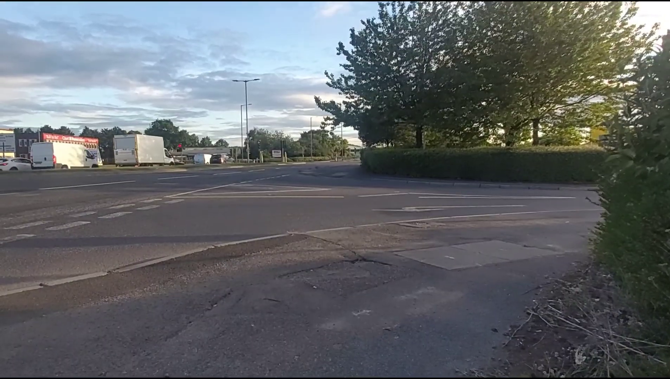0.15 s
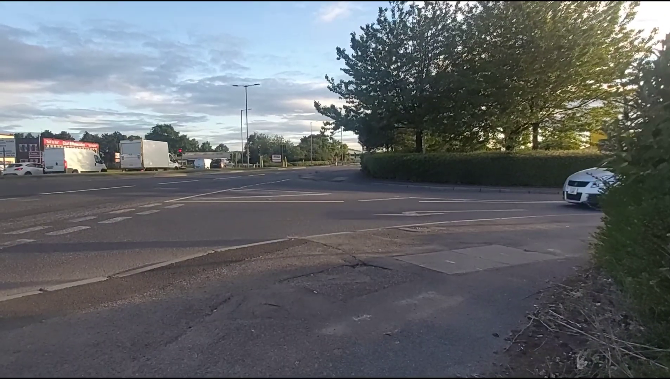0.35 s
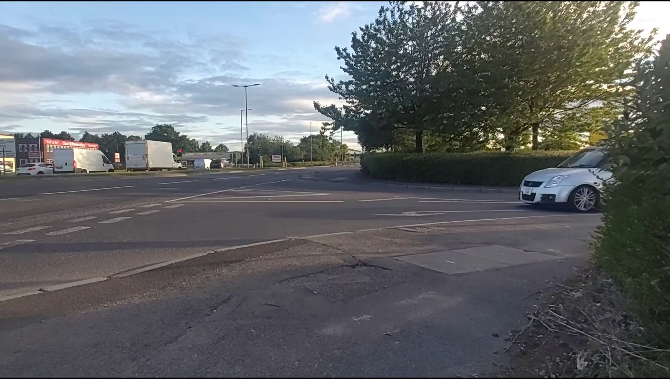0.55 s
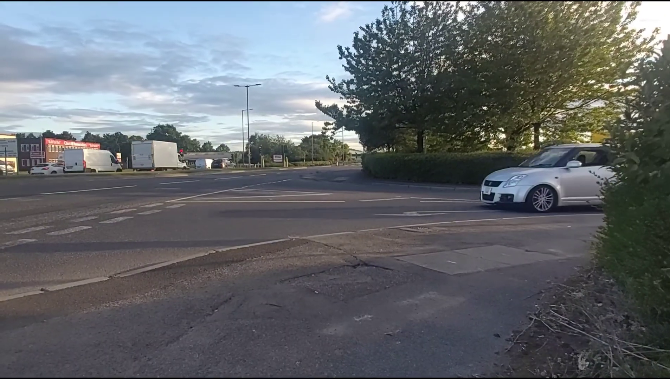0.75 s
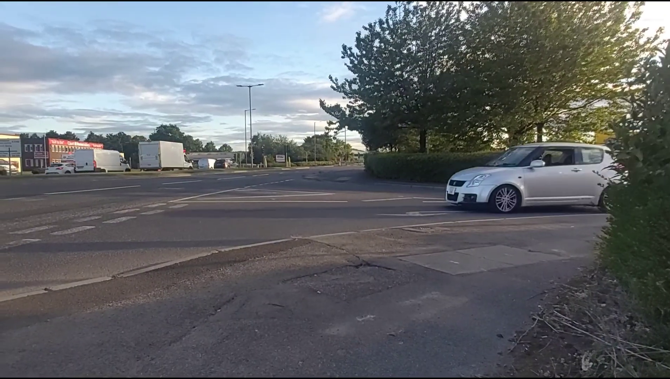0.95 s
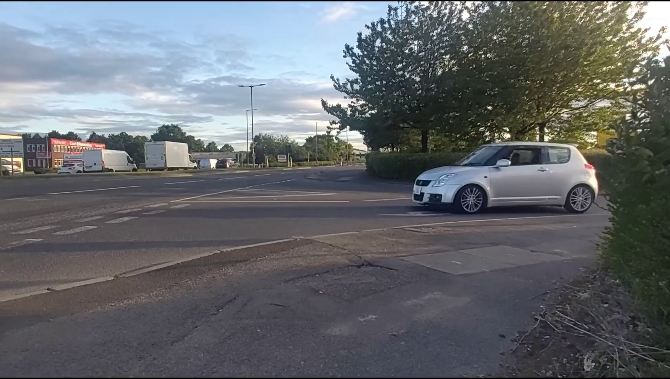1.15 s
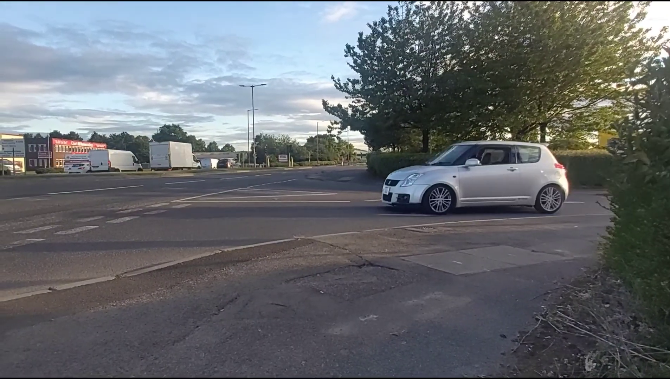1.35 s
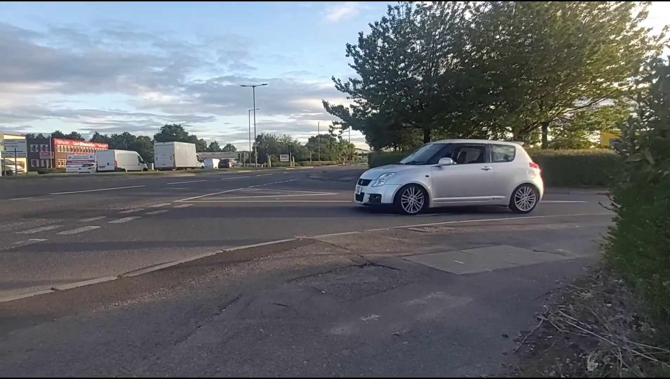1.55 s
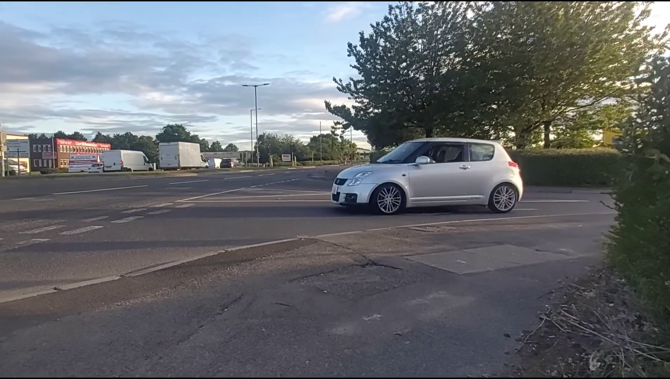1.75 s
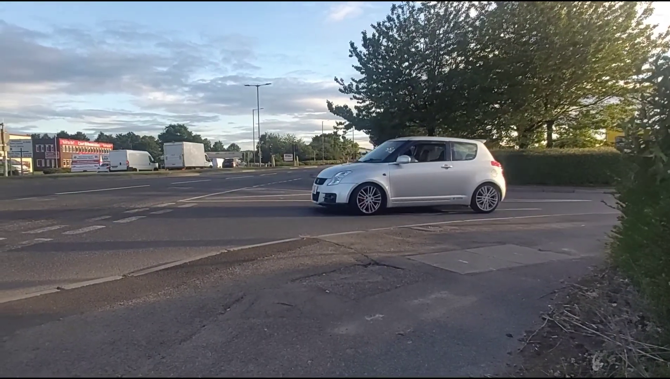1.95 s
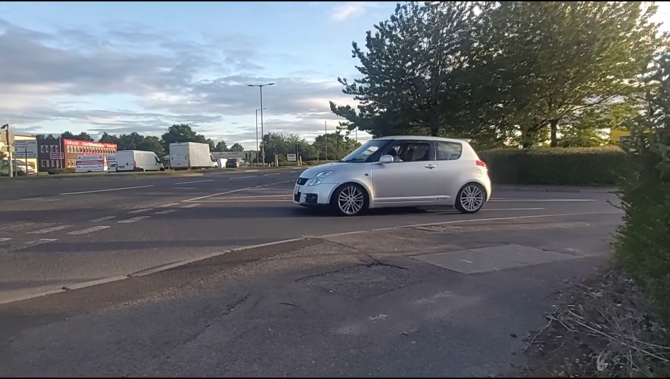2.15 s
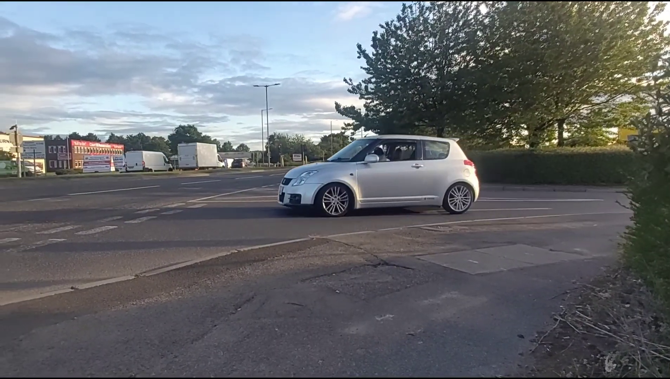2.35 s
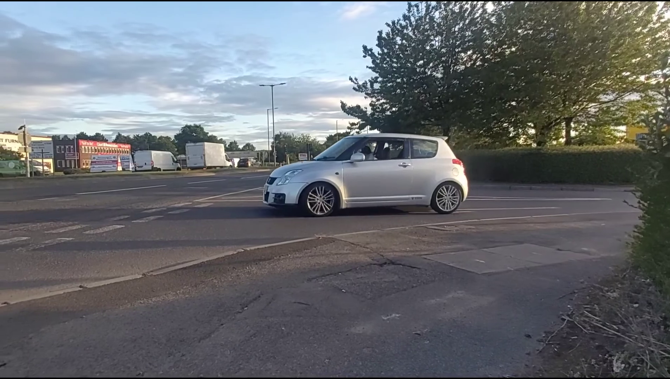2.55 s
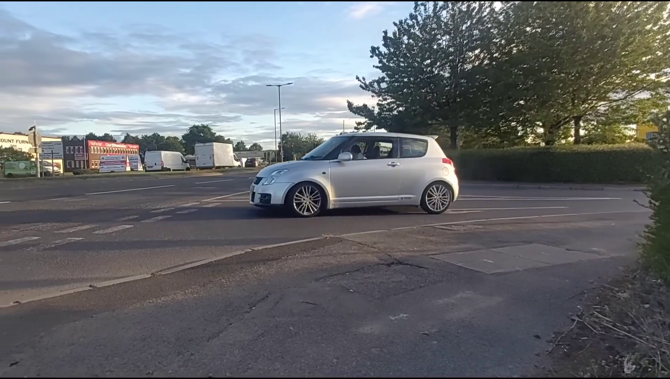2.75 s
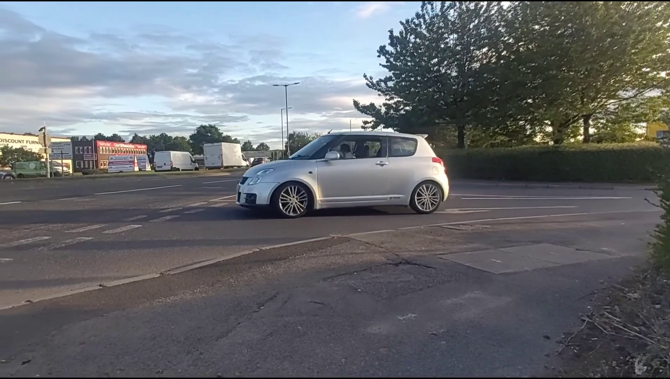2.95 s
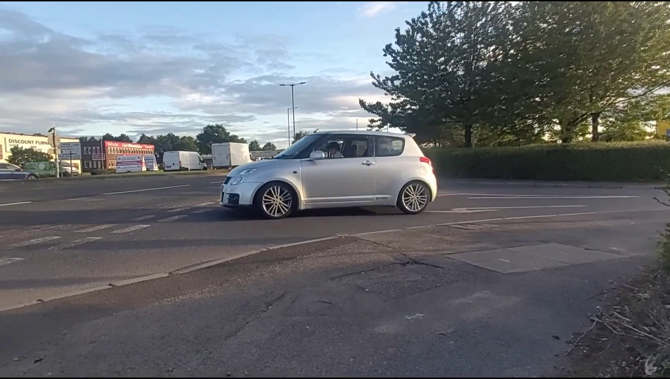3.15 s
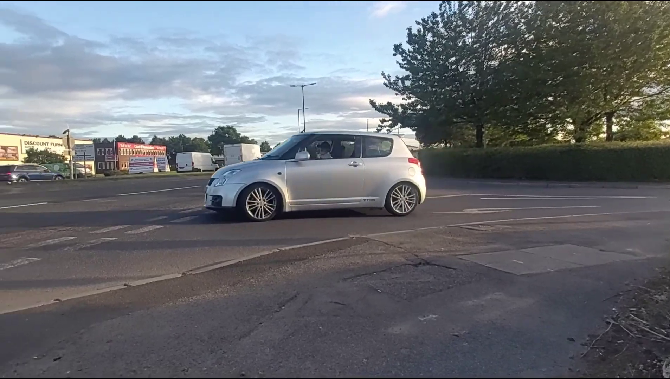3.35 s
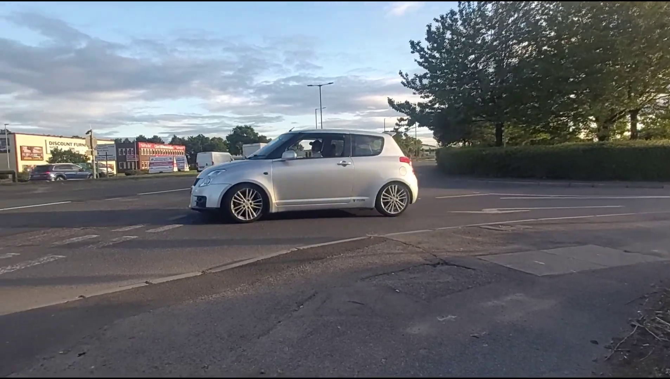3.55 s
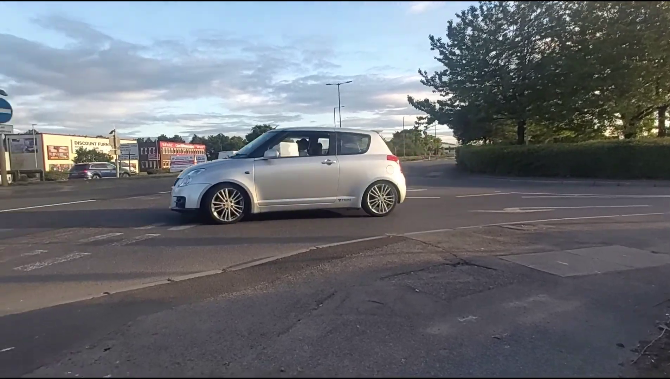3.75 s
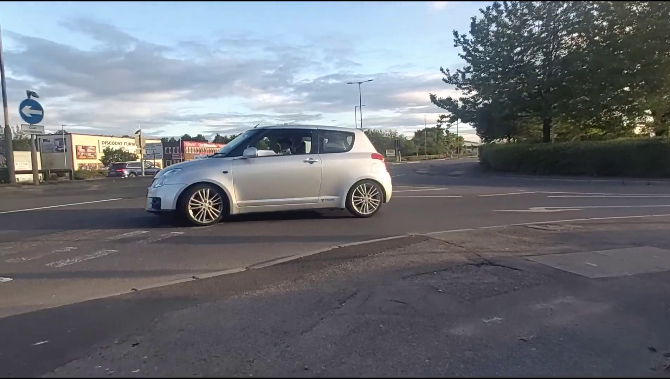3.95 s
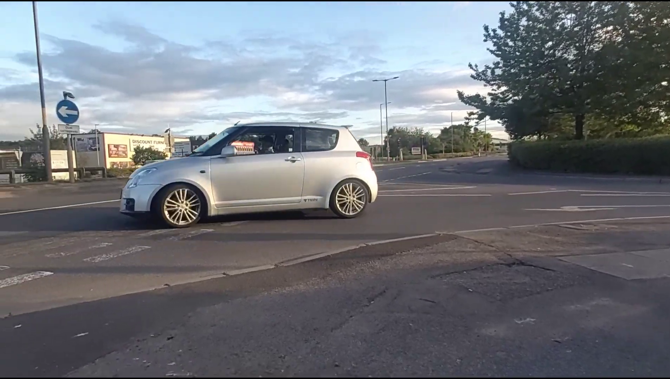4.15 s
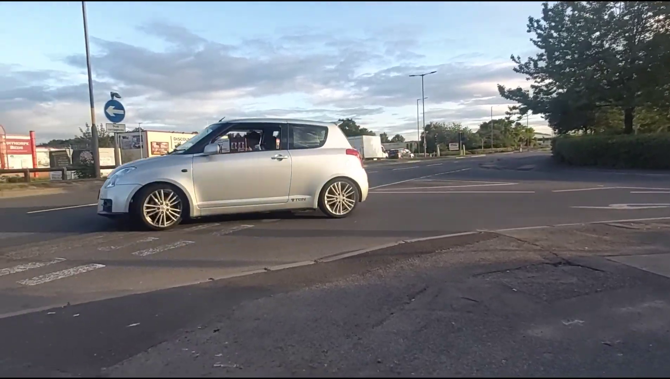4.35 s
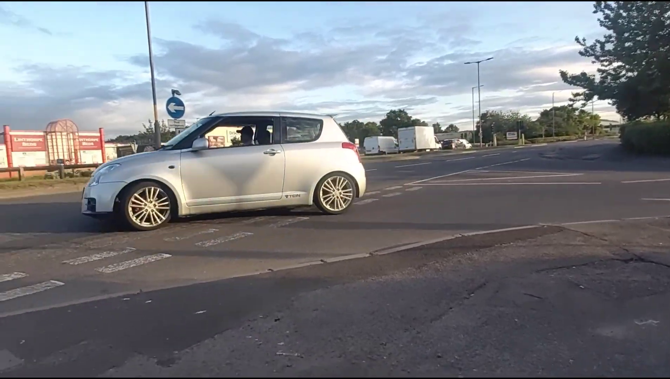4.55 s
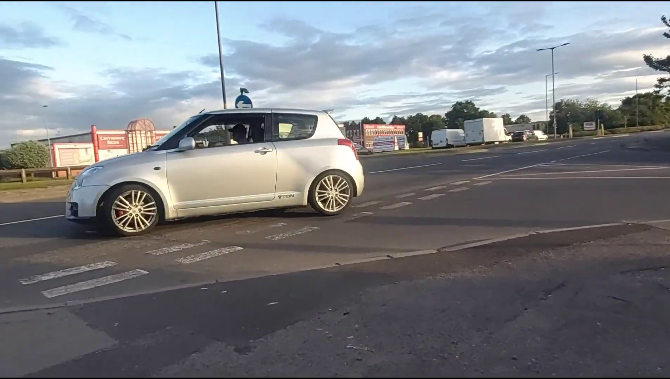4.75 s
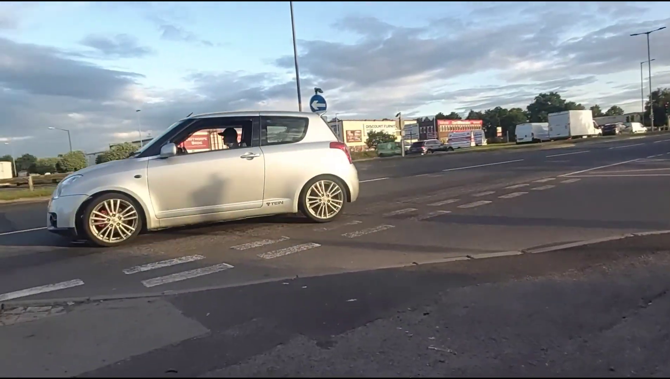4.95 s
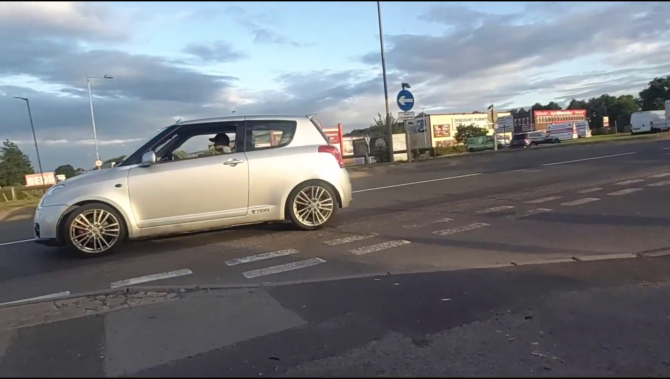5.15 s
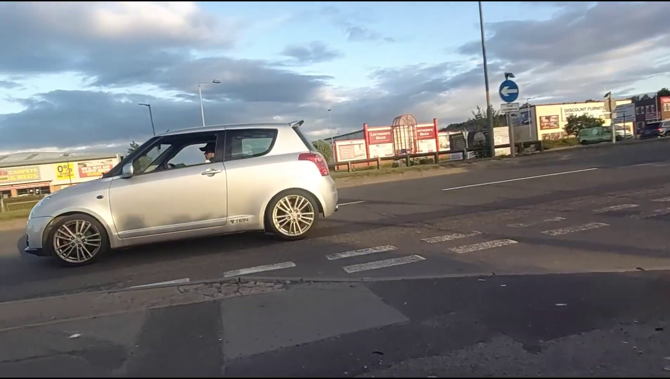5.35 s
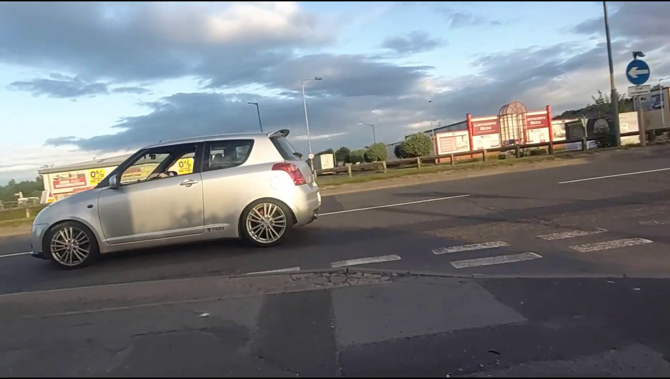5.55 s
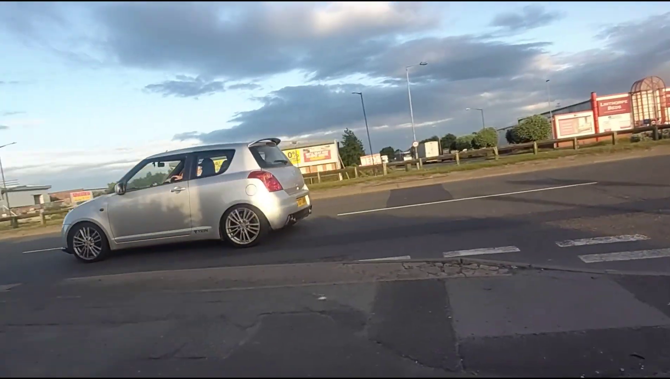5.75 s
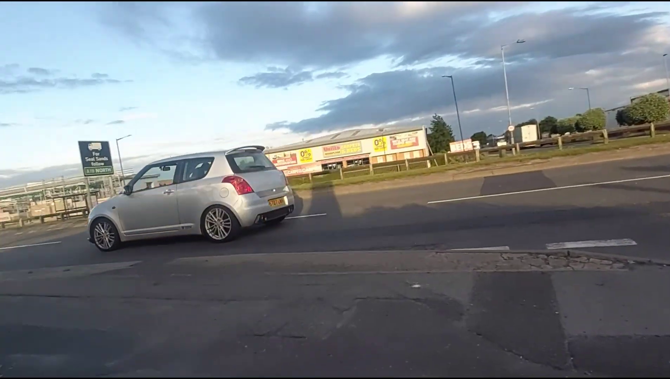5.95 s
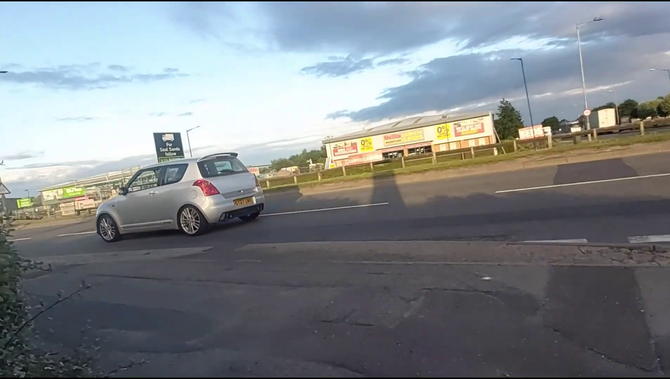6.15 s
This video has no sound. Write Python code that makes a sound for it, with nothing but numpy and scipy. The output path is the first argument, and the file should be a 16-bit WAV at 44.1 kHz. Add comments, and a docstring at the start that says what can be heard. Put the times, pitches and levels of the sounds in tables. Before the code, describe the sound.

From 0 to 0.4 s a close car under power gives a loud, ringing, throbbing roar, slightly rising in pitch, bass towards the right, then breaks off abruptly. A quiet open roadside follows: faint far traffic, low wind rumble, and dull buffets around 0.7-0.9, 1.5 and strongest at 2.1-2.25 s, with a small knocking click near 2.0 s. A small car approaches from the right, muffled behind a hedge, its tyre roll and airy whirr clearing after about 1.8 s and moving to centre. From 3 s a low engine hum and soft chug wavers at low revs while wind strengthens; a hoarse whirr rises from 3.5 s. At 4.36 s the throttle snaps open: a booming, burbling growl climbs continuously, growing louder and snarling with tyre roar. From about 5.9 s to the end at 6.2 s, bright hissing exhaust rasp joins the high revs.

```python
"""Hatchback pulling away from a junction

A car is heard close by under power and its sound breaks off at 0.4 s: firing orders in a ringing roar.
Then a small four-cylinder hatchback rolls up to a junction at low revs, with far traffic in filtered noise
and wind buffeting the microphone. It pulls away hard: its firing orders, summed as cosines, climb through
the exhaust's boom near 300 Hz, and at high revs the tailpipe rasps in puffs of hiss."""
import sys
import numpy as np
from scipy import signal
from scipy.io import wavfile
from scipy.ndimage import uniform_filter1d

SR = 44100
rng = np.random.default_rng(int(sys.argv[2]) if len(sys.argv) > 2 else 0)


def inscribe(sig):
    """Save sig as 16-bit PCM at rate SR to the path in sys.argv[1].

    A 1-D sig is mono; a 2-D sig holds one channel per row.
    Samples are clipped to [-1, 1] before scaling.
    """
    pcm = np.round(np.clip(np.atleast_2d(sig).T, -1, 1) * 32767)
    wavfile.write(sys.argv[1], SR, pcm.astype(np.int16))


N = 273861
TIME = np.arange(N) / SR
CUT_S = .399  # the first car breaks off and the junction begins


def from_db(db):
    """Decibels to gain."""
    return 10 ** (np.asarray(db) / 20)


def rms_one(x):
    """Scale to unit power."""
    return x / np.sqrt(np.mean(x ** 2) + 1e-20)


def even(x, size=4000):
    """Hold the short-term power at 1, over a window of size samples."""
    power = uniform_filter1d(np.mean(np.atleast_2d(x) ** 2, axis=0), size=size)
    return x / np.sqrt(power + 1e-12)


def in_time(rows):
    """One curve over time per column of a table, after its column of seconds."""
    s, *columns = np.transpose(rows)
    return [np.interp(TIME, s, c) for c in columns]


def at_hz(points, hz):
    """Read a spectrum on a log-frequency axis."""
    f, value = np.transpose(points)
    return np.interp(np.log(hz), np.log(f), value)


def after(start_s, fade_s):
    """A smooth switch from 0 to 1."""
    return .5 + .5 * np.tanh((TIME - start_s) / fade_s)


def hump(centre_s, half_s, order=2):
    """A rounded rise and fall of height 1; a higher order flattens its top."""
    return np.exp(-np.abs((TIME - centre_s) / half_s) ** order)


def swelling_db(rows):
    """Sum of humps in dB from rows of (centre_s, half_length_s, level_db)."""
    return sum(db * hump(s, half_s) for s, half_s, db in rows)


def drift(rate_hz):
    """Slow chance of spread 1, made at a fortieth of the sample rate by a double low-pass."""
    r = np.exp(-80 * np.pi * rate_hz / SR)
    slow = signal.lfilter([1], [1, -2 * r, r * r], rng.standard_normal(N // 40 + 2002))[2000:]
    return np.interp(np.arange(N) / 40, np.arange(len(slow)), rms_one(slow))


def band(x, low_hz, high_hz):
    """Butterworth band-pass."""
    sos = signal.butter(2, [low_hz, min(high_hz, SR / 2 - 1)], "band", fs=SR, output="sos")
    return signal.sosfilt(sos, x)


# How alike outdoor noise is at left and right: pitch_hz, likeness (1 = identical)
OUTDOOR_LIKENESS = [(60, 0.21), (700, 0.066), (1300, 0)]


def noise(colour, patchy_db, flicker_hz=14, likeness=None):
    """Third-octave bands of stereo noise, each with its own level, flicker and likeness; rms 1."""
    edges = 2 ** np.arange(np.log2(max(colour[0][0], 18)), np.log2(colour[-1][0]) + .2, 1 / 3)
    out, white = 0, rng.standard_normal((2, 2, N))
    for k, (low, high) in enumerate(zip(edges, edges[1:])):
        mid, side = band(white[k % 2], low, high)
        hz = np.sqrt(low * high)
        alike = np.clip(at_hz(likeness or OUTDOOR_LIKENESS, hz), -1, 1)
        gain = from_db(at_hz(colour, hz) + patchy_db * drift(flicker_hz))
        out = out + gain * (np.sqrt(1 + alike) * mid + np.sqrt(1 - alike) * side * [[1], [-1]])
    return rms_one(out)


def rings(modes, spread):
    """Turbulence exciting resonances (pitch_hz, width_hz, level_db); spread differs between the ears."""
    drive = rng.standard_normal(N) + spread * rng.standard_normal((2, N))
    return sum(from_db(db) * rms_one(band(drive, hz - width / 2, hz + width / 2))
               for hz, width, db in modes)


def bursts(rows, low_hz, high_hz):
    """Short band-passed puffs of noise from rows of (start_s, level_db, decay_s to fall 30 dB)."""
    envelope = sum((TIME >= s) * from_db(db - 30 * np.maximum(TIME - s, 0) / decay)
                   for s, db, decay in rows)
    grain = rng.standard_normal(N) + 0.65 * rng.standard_normal((2, N))
    puffs = envelope * rms_one(band(grain, low_hz, high_hz))
    return band(puffs, low_hz / 2, high_hz * 2)


def gliding_band(rows, half_width_hz):
    """A hoarse band of noise whose centre follows rows of (time_s, pitch_hz, level_db)."""
    hz, db = in_time(rows)
    grain = band(rng.standard_normal(N) + 0.5 * rng.standard_normal((2, N)), 19, half_width_hz)
    whirr = rms_one(grain * np.cos(2 * np.pi * np.cumsum(hz) / SR))
    return from_db(db) * whirr * after(rows[0][0], .04) * (1 - after(rows[-1][0], .04))


def wander(x, share):
    """Shift a sound slowly up and down in pitch at random."""
    read_s = TIME + np.cumsum(share * drift(3)) / SR
    return np.array([np.interp(read_s, TIME, channel) for channel in x])


def crank(firing_hz, jitter):
    """Firing phase in radians; the speed is never quite even."""
    return 2 * np.pi * np.cumsum(firing_hz * (1 + jitter * drift(42.0))) / SR


# Distant traffic: pitch_hz, level_db per Hz (relative)
FAR_COLOUR = [(30, 7.5), (108, -3.5), (202, -14.5), (284, 0), (432, -30), (1080, -18.5), (2130, -44),
              (5740, -24.5), (7260, -52.5), (15500, -48.5)]
FAR_DB = -54.5


def far_traffic():
    """Distant traffic as a steady bed of coloured noise."""
    return from_db(FAR_DB) * noise(FAR_COLOUR, patchy_db=.5)


# Colours of wind at the microphone: pitch_hz, level_db per Hz (relative)
RUMBLE_COLOUR = [(20, -28.5), (48, -2.5), (90, -1), (150, -6), (250, -11)]
FLUTTER_COLOUR = [(110, -27.5), (170, -21), (290, 4), (420, -3.5), (560, -14), (1100, -39)]
# Gusts: centre_s, half_length_s, rumble_db, flutter_db
GUSTS = [(0.74, 0.15, -38.5, -38), (1.487, 0.22, -41.5, -43), (2.23, 0.2, -39.5, -35.5)]
# Breeze between gusts: time_s, rumble_db, flutter_db
BREEZE = [(.44, -46.5, -55.5), (2.0, -48.5, -56), (2.3, -36.5, -38.5), (3.3, -34, -31), (3.7, -31, -29.5),
          (4.5, -30, -34), (5.4, -36, -30), (6.2, -46, -30)]
# Single large eddies: centre_s, level_db
THUMPS = [(0.887, -30.5), (1.039, -34.5), (1.19, -37), (1.271, -36), (1.519, -29), (1.7, -37),
          (2.102, -28.5), (2.24, -21.5)]
THUMP_HALF_S, THUMP_FLUTTER_DB = 0.015, -18  # flutter that an eddy brings, relative to its rumble


def wind():
    """A breeze with gusts and eddies on top: lumpy rumble and a quicker flutter at the microphone ports."""
    rumble_gain, flutter_gain = from_db(in_time(BREEZE))
    for s, half_s, rumble_db, flutter_db in GUSTS:
        gust = hump(s, half_s, order=4)
        rumble_gain = rumble_gain + from_db(rumble_db) * gust
        flutter_gain = flutter_gain + from_db(flutter_db) * gust
    thumps = sum(from_db(db) * hump(s, THUMP_HALF_S) for s, db in THUMPS)
    lumps, eddies = from_db(2.5 * drift(16)), from_db(2.8 * drift(30))
    rumble = (rumble_gain + thumps) * rms_one(noise(RUMBLE_COLOUR, patchy_db=1.0) * lumps)
    flutter_gain = flutter_gain + from_db(THUMP_FLUTTER_DB) * thumps
    flutter = flutter_gain * rms_one(noise(FLUTTER_COLOUR, patchy_db=2.0) * eddies)
    return band(rumble, 36, 1100) * from_db([[-.2], [.2]]) + flutter


# Sharp buffets on the microphone: start_s, flutter_db, decay_s (to fall 30 dB), slap_db
BUFFETS = [(0.657, -33.5, 0.023, -33), (0.695, -38, 0.015, -47), (0.743, -38, 0.069, -40),
           (0.869, -32, 0.02, -31), (1.491, -40, 0.014, -29), (1.542, -41, 0.017, -41),
           (2.088, -37, 0.059, -26), (2.161, -21, 0.033, -28), (2.225, -20.5, 0.077, -26),
           (3.651, -18, 0.033, -32)]
SLAP_LOW_HZ, SLAP_HIGH_HZ = 90, 450


def buffets():
    """Each buffet slaps the ports with one dull pressure pulse, then flutters away."""
    clicks = np.zeros(N)
    for s, _, _, slap_db in BUFFETS:
        clicks[int(s * SR)] = from_db(slap_db)
    height = np.abs(band(signal.unit_impulse(SR), SLAP_LOW_HZ, SLAP_HIGH_HZ)).max()
    pulses = band(clicks + 1e-18, SLAP_LOW_HZ, SLAP_HIGH_HZ)
    slaps = band(pulses, SLAP_LOW_HZ / 2, SLAP_HIGH_HZ * 1.5) / height
    return slaps + bursts([row[:3] for row in BUFFETS], 130, 520)


# Small clicks: start_s, level_db
TICKS = [(1.374, -44), (1.977, -24.5)]
# Knocking body of a click: pitch_hz, level_db (relative to the click), t60_s
TICK_MODES = [(290, -2.5, 0.041), (450, -4, 0.016), (1130, -7, .012), (1437, -5.5, .008),
              (2213, -14, 0.0045)]
TICK_EDGE_DB = -28  # bright edge, relative to the click


def ticks():
    """Each small click has a bright noisy edge and a short, knocking body of decaying sines."""
    out = 0
    for s, db in TICKS:
        age = np.maximum(TIME - s, 0)
        for k, (hz, mode_db, t60) in enumerate(TICK_MODES):
            fading = from_db(db + mode_db - np.minimum(60 * age / t60, 200))
            out = out + fading * np.sin(2 * np.pi * hz * age) * (-1) ** k
    return out + bursts([(s, db + TICK_EDGE_DB, .006) for s, db in TICKS], 1500, 11000)


# First car's revs: time_s, firing_hz, level_db of firing orders 1, 2 and 4
FIRST_REVS = [(0, 88.5, -34, -21.5, -41), (.1, 94.06, -43, -37.5, -54), (.2, 100.7, -27, -38, -27),
              (.29, 103.2, -29.5, -40, -30.5), (.38, 105.6, -34, -30, -28.5)]
# Its weaker orders: order, start_level_db, end_level_db
FIRST_OVERTONES = [(5, -44, -40.5), (6, -38, -61)]
# Its roar: pitch_hz, level_db per Hz (relative)
FIRST_ROAR = [(36, -9.5), (350, -13), (410, -12), (639, -19.5), (2180, -23), (3200, -33.5), (3880, -31),
              (6900, -36.5), (8300, -53), (10000, -42.5), (15500, -49)]
# Course of the roar, raised 3 dB when played: time_s, level_db
FIRST_LEVEL = [(0.01, -24.8), (0.38, -26)]
# Left-right likeness of the roar: pitch_hz, likeness (negative = opposed)
FIRST_LIKENESS = [(130, -0.0058), (360, 0.5), (700, -0.4), (1250, -0.52), (2200, 0.078), (4000, -0.06)]
# Resonances in the roar: pitch_hz, width_hz, level_db
FIRST_RINGS = [(906, 167, -35), (2160, 420, -31), (3860, 370, -38), (6240, 750, -40.5)]
# Bass lies to the right, top treble to the left: one row per ear (left, right), gain_db
FIRST_BASS_DB = [
    [-13],
    [2.5],
]
FIRST_HISS_DB = [
    [2.5],
    [0],
]


def first_car():
    """A close car under power: firing orders in a loud, ringing roar that throbs, ending at once."""
    firing_hz, *levels_db = in_time(FIRST_REVS)
    phase = crank(firing_hz, jitter=.003)
    orders = list(zip((1, 2, 4), levels_db))
    for k, *ends_db in FIRST_OVERTONES:
        orders.append((round(k), np.interp(TIME, [0, CUT_S], ends_db)))
    note = sum(from_db(db + drift(10)) * np.sqrt(2) * np.cos(k * phase + rng.uniform(0, 2 * np.pi))
               for k, db in orders)
    roar = from_db(3.0) * noise(FIRST_ROAR, patchy_db=1.0, likeness=FIRST_LIKENESS)
    roar = roar * from_db(in_time(FIRST_LEVEL)[0]) + rings(FIRST_RINGS, spread=1.4)
    car = note + roar * (1 + 0.12 * np.cos(phase))
    bass = signal.sosfiltfilt(signal.butter(3, 290, fs=SR, output="sos"), car)
    top = signal.sosfiltfilt(signal.butter(3, 6000, "high", fs=SR, output="sos"), car)
    placed = car + bass * (from_db(FIRST_BASS_DB) - 1) + top * (from_db(FIRST_HISS_DB) - 1)
    return placed * (1 - after(CUT_S, 0.0031))


# Fine tyre hiss: time_s, level_db
HISS = [(.44, -91), (.85, -69), (2.45, -76.5), (2.95, -67.5), (3.9, -64), (4.25, -56), (4.55, -58)]
# Brief spurts of it: centre_s, half_length_s, rise_db
SPURTS = [(4.418, 0.044, 11)]
# Its colour: pitch_hz, level_db per Hz (relative)
HISS_COLOUR = [(7000, 13), (8500, -10.5), (11000, 12), (15500, -4.5)]


def tyre_hiss():
    """Fine high noise from the tyres, with brief spurts."""
    hiss_db = in_time(HISS)[0] + swelling_db(SPURTS)
    return from_db(hiss_db) * noise(HISS_COLOUR, patchy_db=.7)


GRIT_PER_S, GRIT_DB, GRIT_SPREAD_DB = 260, -11, 5  # level relative to the roll, spread of sizes


def grit():
    """Small stones crunch under the tyres at random, each a short dull crack."""
    sizes = from_db(GRIT_SPREAD_DB * np.minimum(rng.exponential(1, N), 3)) * rng.choice([-1, 1], N)
    cracks = sizes * (rng.random(N) < GRIT_PER_S / SR) + 1e-18
    crunch = band(cracks, 480, 760)
    crunch = crunch + from_db(-7.5) * band(cracks, 1210, 1370)
    crunch = crunch + from_db(-23.0) * band(cracks, 2600, 2860)
    return from_db(GRIT_DB) * rms_one(crunch)


# Tyre and engine-bay noise: pitch_hz, level_db per Hz (relative)
ROAD_COLOUR = [(500, 4.5), (780, -1.5), (1000, -2), (1500, -11.5), (2500, -16), (3000, -14), (5000, -14.5),
               (6200, -28), (7500, -50.5)]
# Rolling noise as the car nears and speeds up: time_s, rise_db
APPROACH = [(.44, -6), (2.6, -6.5), (3.4, -4), (4.5, 3.5), (5.2, 7.5), (6.2, 10.5)]
# The rolling noise swells: centre_s, half_length_s, rise_db
SWELLS = [(0.842, 0.53, 39.5), (1.363, 0.096, 25), (2.282, 0.18, 4), (2.996, 0.21, 5), (4.25, 0.23, 5)]
# The tread sings in one band: pitch_hz, width_hz, level_db (relative to the roll)
TREAD_RING = [(1374, 130, -12)]
# Engine-bay resonances: pitch_hz, width_hz, level_db (relative to the whirr setting)
BAY_RINGS = [(1110, 110, -8.5), (1340, 69, -8.5), (1769, 190, -6), (2314, 180, -8), (2494, 130, -7),
             (3170, 200, -14.5)]
BAY_WANDER = .008  # share by which these resonances wander at random in pitch
ROLL_DB, WHIRR_DB = -42.5, -47  # before approach, hedge and swells
ROLL_FOLLOWS = 0.48  # share of a swell that reaches the low roll
HEDGE_CLEAR_S, HEDGE_FADE_S = 1.83, 0.22  # the car comes out from behind a hedge
HEDGE_ROLL_DB, HEDGE_WHIRR_DB = -29.5, -80  # what the hedge takes away


def rolling(phase):
    """Tyre roll and engine-bay whirr, dulled by the hedge and throbbing with the firings."""
    approach_db, = in_time(APPROACH)
    hidden = 1 - after(HEDGE_CLEAR_S, HEDGE_FADE_S)
    swell_db = swelling_db(SWELLS)
    roll_db = ROLL_DB + approach_db + HEDGE_ROLL_DB * hidden + ROLL_FOLLOWS * swell_db
    whirr_db = WHIRR_DB + approach_db + HEDGE_WHIRR_DB * hidden + swell_db
    rush = noise(ROAD_COLOUR, patchy_db=1.6)
    low = rms_one(signal.sosfilt(signal.butter(4, 1700, fs=SR, output="sos"), rush))
    high = rms_one(signal.sosfilt(signal.butter(4, 1800, "high", fs=SR, output="sos"), rush))
    roll = low + grit() + rings(TREAD_RING, spread=0.76)
    whirr = from_db(-3.0) * high + wander(rings(BAY_RINGS, spread=1.0), BAY_WANDER)
    return (from_db(roll_db) * roll + from_db(whirr_db) * whirr) * (1 + 0.12 * np.cos(phase))


# Gliding bands: time_s, pitch_hz, level_db
# a hoarse whirr rising in pitch from 3.5 to 4.45 s
RISING_WHIRR = [(3.5, 2056, -56), (3.7, 2162, -47.5), (4.0, 2300, -51.5), (4.2, 2525, -41.5),
                (4.33, 2765, -45), (4.45, 3144, -51)]
# a faint, falling airy whistle
WHISTLE = [(.72, 2500, -91), (.84, 2350, -65), (.92, 2200, -71), (1.1, 2090, -98)]
# a rush near 2.4 kHz from 2.0 to 3.25 s
RUSH = [(2.01, 2450, -70), (2.1, 2414, -58), (2.24, 2396, -49), (2.42, 2395, -49.5), (2.65, 2490, -71),
        (3.0, 2500, -48), (3.25, 2500, -60)]


def whirrs():
    """A rising hoarse whirr, an airy whistle and a rush, each a narrow band of noise that glides in pitch."""
    rising = gliding_band(RISING_WHIRR, half_width_hz=310)
    whistle = gliding_band(WHISTLE, half_width_hz=120)
    return rising + whistle + gliding_band(RUSH, half_width_hz=340)


# Exhaust pipe and silencer resonances: pitch_hz, width_hz, level_db
PIPE = [(290.3, 71, 7), (367, 193, -8.5), (640, 55, -16.5), (735, 83, -12.5), (818, 96, -26),
        (1075, 89, -29), (1350, 145, -25), (1606, 83, -27.5), (2367, 190, -25.5), (2581.5, 114, -22.5)]


def pipe(hz, modes):
    """Gain of the exhaust: resonances with steep skirts, as in a chain of silencer chambers."""
    return sum(from_db(db) / (1 + ((hz * hz - f * f) / (hz * width)) ** 2) for f, width, db in modes)


# Exhaust hum off throttle: time_s, level_db
COAST = [(2.7, -28.5), (3.02, -37.5), (3.12, -28.5), (3.25, -31.5), (3.41, -25), (3.6, -35), (3.8, -31.5),
         (3.91, -27), (4.02, -32.5), (4.13, -34.5), (4.24, -27.5), (4.35, -23.5)]
# Soft chug off throttle: time_s, level_db of firing orders 1, 2 and 4
CHUG = [(3.1, -54, -45, -57), (3.75, -47, -35, -59), (3.95, -36, -39.5, -36.5), (4.3, -39, -41, -46)]


def coasting(firing_hz, phase):
    """Off throttle, the order nearest the lowest pipe resonance hums over a soft chug."""
    hum = sum(pipe(k * firing_hz, PIPE[:1]) ** 2.5 * from_db(drift(12)) * np.cos(k * phase + rng.normal())
              for k in range(4, 9))
    chug = sum(np.sqrt(2) * from_db(db + 2 * drift(12)) * np.cos(k * phase)
               for k, db in zip((1, 2, 4), in_time(CHUG)))
    return (from_db(in_time(COAST)[0]) * even(hum) + chug) * after(2.85, .15)


# The four lowest firing orders, swelling in turn as they climb through the exhaust's standing waves;
# one list per order: time_s, level_db
BOOM = [
    [(4.6, -44), (4.8, -25), (4.96, -21.5), (5.15, -24), (5.45, -41), (5.65, -36), (6.02, -24),
     (6.21, -28.5)],
    [(4.4, -34), (4.67, -26), (5.0, -36.5), (5.55, -30), (5.63, -23), (5.71, -11), (5.83, -25.5),
     (5.9, -15.5), (6.09, -8.5), (6.21, -10.5)],
    [(4.58, -52.5), (4.73, -23.5), (4.81, -19), (4.86, -23.5), (4.94, -17), (5.2, -23.5), (5.3, -15),
     (5.38, -23.5), (5.44, -14.5), (5.54, -20.5), (5.61, -13.5), (5.8, -24.5), (6.21, -26.5)],
    [(4.33, -32.5), (4.45, -14.5), (4.62, -18), (4.74, -37.5), (4.93, -23.5), (5.12, -28), (5.25, -38),
     (5.7, -46), (6.05, -36), (6.21, -36)],
]
# Burble of unequal cylinders: pitch_hz, level_db (relative)
BURBLE_COLOUR = [(180, -10.5), (270, 2), (380, -2.5), (440, -4), (520, -15.5)]
BURBLE_DB, BURBLE_DB_PER_OCTAVE = -38.5, -1.5  # at 100 firings a second; change with the revs
BURBLE_SPREAD_DB = 3  # unsteadiness of each order


def boom(firing_hz, phase):
    """The four lowest firing orders, with a burble of quarter orders from the unequal cylinders between."""
    # each order's phase lags a little more, so that their peaks do not pile up
    lag = .3 * np.arange(5) ** 2
    orders = sum(from_db(in_time(rows)[0] + .8 * drift(30)) * np.cos(k * phase - lag[k])
                 for k, rows in enumerate(BOOM, 1))
    burble = 0
    for k in [quarter / 4 for quarter in range(5, 20) if quarter % 4]:
        level_db = at_hz(BURBLE_COLOUR, k * firing_hz) + BURBLE_SPREAD_DB * drift(4)
        burble = burble + from_db(level_db) * np.cos(k * phase + rng.uniform(0, 2 * np.pi) + .6 * drift(4))
    burble_db = BURBLE_DB + BURBLE_DB_PER_OCTAVE * np.log2(firing_hz / 100)
    return np.sqrt(2) * (orders + burble * from_db(burble_db))


# Strength of firing orders 5 to 20: level_db (relative)
ORDER_DB = [1.5, 3.5, -1, 0.5, -1.5, 2.5, 1.5, -4.5, 0, -4, -12, -5.5, -6.5, -8.5, -10, -6]
# The upper orders swell and sag: centre_s, half_length_s, change_db
SURGES = [(4.36, 0.15, -2.5), (5.445, 0.042, 4.5), (5.783, 0.12, -2)]
HALF_ORDER_DB, QUARTER_ORDER_DB = -16, -22  # unequal cylinders, among the upper orders
PULSE_TOP_ORDER = 9.15  # the growl falls away above this order
GROWL_DB, GROWL_DB_PER_OCTAVE = -21.5, 6  # at 100 firings a second; growth with the revs
SNARL_DB, SNARL_FROM_HZ, SNARL_DB_PER_OCTAVE = -21.5, 109, 27  # grows above this firing rate
ROUGH_DB = 1.3  # firings differ in strength


def growl_level_db(firing_hz):
    """The growl grows with the revs."""
    return GROWL_DB + GROWL_DB_PER_OCTAVE * np.log2(firing_hz / 100)


def growl_and_snarl(firing_hz, phase):
    """Upper firing orders shaped by the pipe: growl below about 1 kHz, snarl above it."""
    snarl_db = SNARL_DB + SNARL_DB_PER_OCTAVE * np.maximum(np.log2(firing_hz / SNARL_FROM_HZ), 0)
    growl, snarl = from_db(growl_level_db(firing_hz)), from_db(snarl_db)
    upper = np.zeros((2, N))
    for k in np.r_[5:11:.25, 11:20.5:.5]:
        hz = k * firing_hz
        # random phases soften each pulse, more so in the upper orders
        angle = k * phase + rng.normal() * min(k / 8, 2) + .022 * min(k, 12) * drift(40)
        if k % .5:
            pattern_db = QUARTER_ORDER_DB
        elif k % 1:
            pattern_db = HALF_ORDER_DB
        else:
            pattern_db = ORDER_DB[int(k) - 5]
        rounded = 1 / (1 + (k / PULSE_TOP_ORDER) ** 14)
        bright = 1 / (1 + (1000 / hz) ** 12)
        above_boom = 1 / (1 + (430 / hz) ** 6)
        unsteady = from_db(pattern_db + 1.6 * drift(3) + .8 * drift(40))
        source = growl * rounded * (1 - bright) + snarl * bright
        strength = pipe(hz, PIPE) * above_boom * unsteady * source
        # left and right phases drift apart at random, more so in higher orders
        ear_angle = np.minimum(hz / 3200, .45) * drift(2) * [[1], [-1]]
        upper += np.sqrt(2) * strength * np.cos(angle + ear_angle)
    return upper * from_db(swelling_db(SURGES) + ROUGH_DB * drift(60))


# Turbulent exhaust gas: pitch_hz, width_hz, level_db (relative)
GAS_RINGS = [(276.5, 93, 1.5), (447, 45, -3), (722, 110, -5.5)]
GAS_DB = -11.5  # relative to the growl, before it pulses


def exhaust_gas(firing_hz, phase):
    """Turbulent gas leaves with each pulse and rings the pipe."""
    turbulence = rms_one(rings(GAS_RINGS, spread=.4)) * (1 + np.cos(phase))
    return band(from_db(growl_level_db(firing_hz) + GAS_DB) * turbulence, 98, 3000)


THROTTLE_S = 4.36  # the throttle opens


def exhaust(firing_hz, phase):
    """A hum and chug off throttle give way to boom, growl, snarl and gas as the throttle opens."""
    throttle = after(THROTTLE_S, 0.012)
    pulling = boom(firing_hz, phase) + growl_and_snarl(firing_hz, phase) + exhaust_gas(firing_hz, phase)
    return coasting(firing_hz, phase) * (1 - throttle) + throttle * pulling


# Gas jet at the tailpipe: time_s, level_db
RASP = [(5.75, -57.5), (5.916, -44), (5.992, -30.5), (6.18, -25.5)]
# Its colour: pitch_hz, level_db per Hz (relative)
RASP_COLOUR = [(3000, 1), (5100, -14), (7000, -23.5), (8500, -16), (10100, -10.5), (12000, -7.5),
               (15500, -26.5)]
# Its resonances: pitch_hz, width_hz, level_db (within the jet)
RASP_RINGS = [(5121, 520, 1), (5686, 350, -3.5)]
PUFF_FLOOR = .6  # steady part of the jet, against 1 for the peak that a puff adds
ZING_HZ, ZING_FALL_HZ, ZING_DB = 5170, 330, 2  # each puff whistles briefly, falling in pitch


def rasp(phase):
    """At high revs each firing blows a puff of hiss from the tailpipe, with a falling zing near 5 kHz."""
    puffs = rms_one(PUFF_FLOOR + (.5 + .5 * np.cos(phase)) ** 2.3)
    ear_drift = np.array([drift(150), drift(150)])
    zing_hz = ZING_HZ - ZING_FALL_HZ * np.sin(phase) + 130 * ear_drift + 90 * drift(40)
    zing = np.cos(2 * np.pi * np.cumsum(zing_hz, axis=1) / SR)
    zing = from_db(ZING_DB) * (1 + np.cos(phase)) * zing
    jet = rings(RASP_RINGS, spread=1.8) + from_db(-4.0) * noise(RASP_COLOUR, patchy_db=1.2)
    return from_db(in_time(RASP)[0]) * puffs * even(jet + zing, size=300) * after(5.58, 0.17)


# Hatchback's revs, rolling up and then pulling away: time_s, firing_hz
ROLL_UP_REVS = [(3.03, 47.27), (3.18, 49.8), (3.76, 48.12), (3.9, 50.04), (4.1, 57.04)]
PULL_REVS = [(4.35, 66.76), (4.432, 71.75), (4.586, 77.95), (4.726, 84.96), (4.968, 97.9), (5.188, 109),
             (5.4, 119.5), (5.7, 137.1), (5.942, 151), (6.08, 159.7), (6.21, 166.7)]
# Side on which tyres and traffic lie: time_s, left_minus_right_db
TYRE_PAN = [(.5, -15.5), (2.3, -3), (3.5, 0.5)]


def scene():
    """The first car close by, then the hatchback at the junction in the wind."""
    firing_hz = in_time(list(ROLL_UP_REVS) + list(PULL_REVS))[0]
    phase = crank(firing_hz, jitter=.0015)
    pan = from_db(in_time(TYRE_PAN)[0] * [[.5], [-.5]])
    road = (far_traffic() + tyre_hiss() + rolling(phase)) * pan
    background = road + wind() + buffets() + ticks()
    junction = background + whirrs() + exhaust(firing_hz, phase) + rasp(phase)
    return first_car() + junction * after(CUT_S, .002) * from_db([[-.2], [.2]])


CUTOFF_HZ = 15750


def record(dry):
    """The highest peaks are rounded and the top is cut steeply."""
    rounded = dry / (1 + (dry / .92) ** 8) ** (1 / 8)
    return signal.sosfilt(signal.ellip(12, .1, 90, CUTOFF_HZ, fs=SR, output="sos"), rounded)


dry = scene()
out = record(dry)
inscribe(out)
```